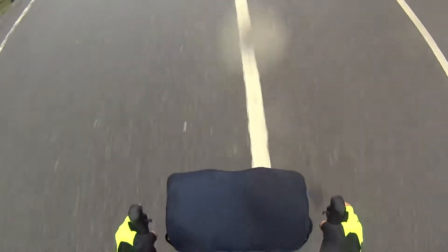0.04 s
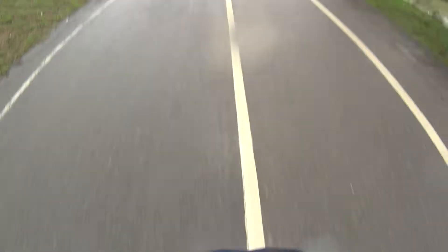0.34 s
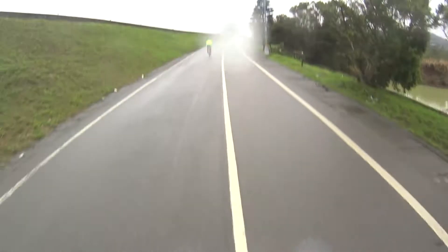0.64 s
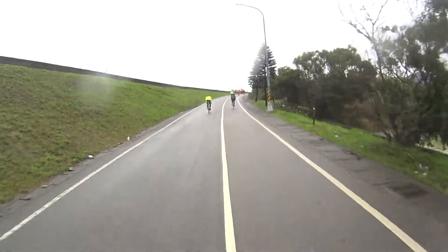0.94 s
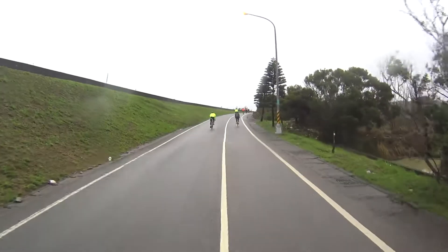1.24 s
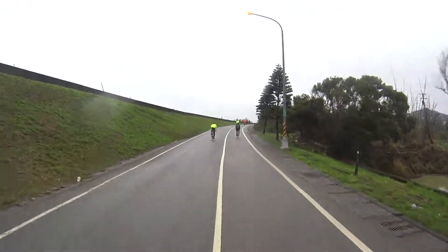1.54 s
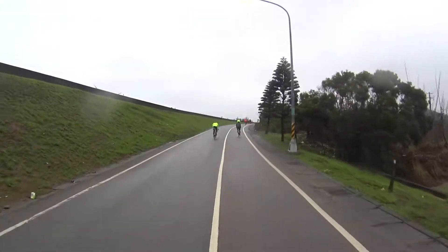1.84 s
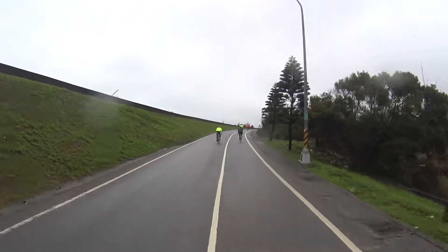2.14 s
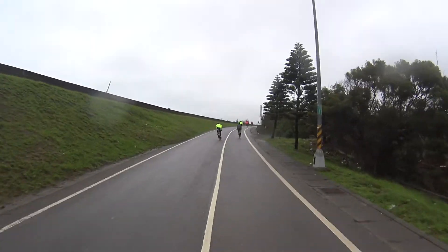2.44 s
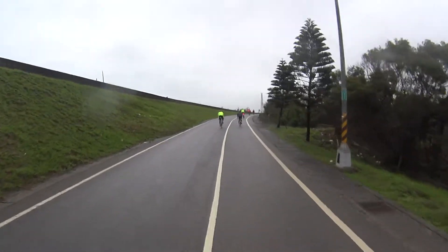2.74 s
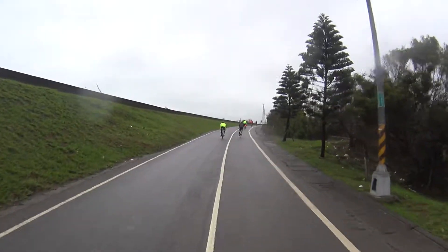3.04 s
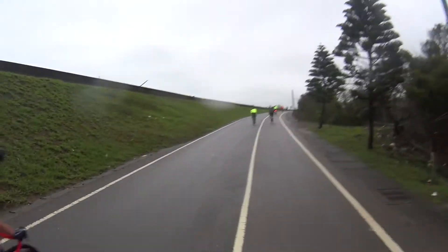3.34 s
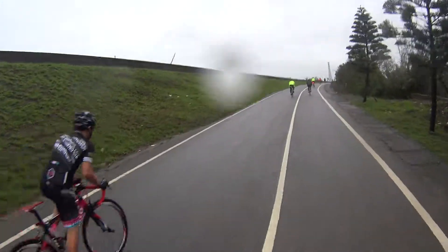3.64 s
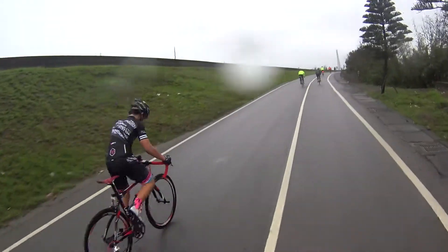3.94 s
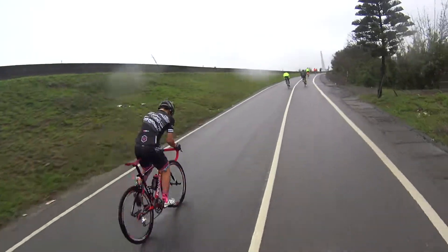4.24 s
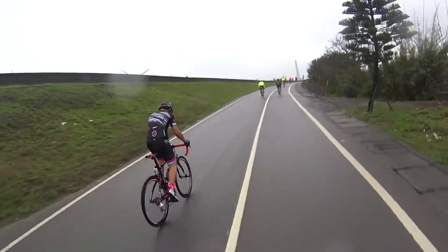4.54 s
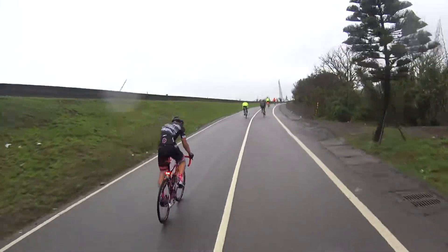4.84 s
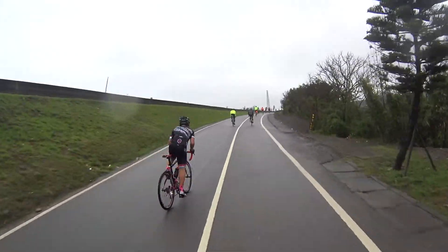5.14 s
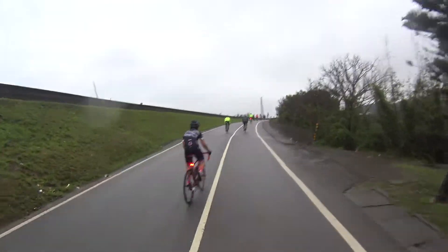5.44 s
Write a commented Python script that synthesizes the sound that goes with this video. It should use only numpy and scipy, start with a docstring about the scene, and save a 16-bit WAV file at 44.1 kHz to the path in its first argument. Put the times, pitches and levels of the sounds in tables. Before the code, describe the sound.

Wind rumbles and rushes over a microphone mounted on a bicycle moving along a wet path, with tyres hissing softly below. At first the air sputters and the mount rattles with quick knocks. The sputter dies, leaving wind and scattered sharp ticks. After a lull, the gusts grow, another bicycle overtakes with a rolling whir and light rattle, and the knocks return.

```python
"""A wet path, heard from the two microphone ports of a camera mounted on a moving bicycle.
At first the camera faces down: air sputters across it and bumps rattle the mount, right at the microphone.
It swings up and the sputter dies. Wind goes on buffeting the case and rushing through its resonances,
while the tyres hiss and throw spray just below; the bike and drops tick, and a few faint scuffs pass.
Near 3.8 s another rider overtakes alongside, and the mount knocks again as the ride goes on."""
import sys
import numpy as np
from scipy.fft import rfft, irfft, next_fast_len
from scipy.io import wavfile
from scipy.ndimage import uniform_filter1d, minimum_filter1d, map_coordinates

SR = 44100
rng = np.random.default_rng(int(sys.argv[2]) if len(sys.argv) > 2 else 0)


def output_pcm(signal):
    """Save a mono or channel-first signal as 16-bit PCM at the path in sys.argv[1].

    Samples are clipped to [-1, 1] before scaling.
    """
    pcm = np.clip(np.atleast_2d(signal).T, -1, 1) * 32767
    wavfile.write(sys.argv[1], SR, np.round(pcm).astype(np.int16))


N = 246078
TIME_S = np.arange(N) / SR


# Spectra of the wind's low buffeting, its rush and its thin edge near 2 kHz: frequency_hz, level_db
BUFFET_SPECTRUM = [(15, -29), (25, -14), (45, -7), (75, 0), (140, 0.5), (210, -3.5), (300, -10),
                   (450, -15.5), (700, -16.5), (1200, -35), (3000, -60), (6000, -100)]
RUSH_SPECTRUM = [(100, -46), (300, -26.5), (600, -17.5), (1000, -14.5), (1200, -4), (1500, -4), (1800, -3),
                 (2100, -8), (2800, -16), (3600, -24), (6000, -36), (11000, -75)]
EDGE_SPECTRUM = [(900, -64), (1700, -46), (2100, -2), (2350, 3), (2800, -4.5), (3400, -10.5), (4500, -18),
                 (8000, -58)]
# Rise and fall of the edge, on top of what the airflow gives it: time_s, gain_db
EDGE_GAIN = [(0.0, 2), (0.3, 4.5), (0.68, -5.9), (1.05, 1.2), (1.6, 1.4), (2.85, 3.5), (3.5, 0), (4.1, -2),
             (4.5, 1.5), (4.8, -12.5), (5.2, 1.5), (5.58, -2.1)]

def wind(buffet_db, rush_db, swing_s, shelter_db=3.5, shelter_end_s=0.316):
    """At the microphone, low eddies press on both ports alike; finer ones and road chatter sound the case."""
    # facing down, the ports are sheltered from the low eddies
    sheltered = np.clip((shelter_end_s - TIME_S) / swing_s, 0, 1)
    buffet_gain = amp(buffet_db - shelter_db * sheltered + 0.73 + 1.4 * wobble(14))
    buffet = buffet_gain * ports(noise(), BUFFET_SPECTRUM)
    eddies = amp(0.65 * wobble(18) + 1.1 * wobble(70))
    chatter = grains(per_s=500, spread_db=7.5)
    rush = amp(rush_db - 1.05) * hollow_case(ports(noise() + 0.35 * chatter, RUSH_SPECTRUM))
    edge_db = rush_db - 7 + over_time(EDGE_GAIN)
    edge = amp(edge_db - 1.5) * ports(noise() + 0.81 * chatter, EDGE_SPECTRUM)
    return buffet + eddies * (rush + edge)


# Spectrum of the air tearing off the case: frequency_hz, level_db
SPUTTER_SPECTRUM = [(200, -34), (600, -29), (1000, -8), (1350, -7.5), (1750, -2), (2200, 4), (2600, -9),
                    (3300, -18), (6000, -41), (11000, -74)]

def sputter(lift_s, swing_s, drop_db=8, fade_db_per_s=31):
    """Air tears off the lowered case in bursts, different at each port; it dies as the camera swings up."""
    since_lift_s = np.maximum(TIME_S - lift_s, 0)
    raised = np.minimum(since_lift_s / swing_s, 1)
    level_db = -22 - drop_db * raised - fade_db_per_s * since_lift_s
    bursts = unit_rms(amp(3.5 * wobble(129.8)))
    correlation = [(400, 0.5), (1000, -0.1), (1400, 0.61), (2100, -0.87), (3000, 0.0024)]
    return amp(level_db) * bursts * ports(noise(), SPUTTER_SPECTRUM, correlation)


# Spectra of the tyres' wet hiss and their roar: frequency_hz, level_db
HISS_SPECTRUM = [(800, -17.5), (2500, -0.5), (3500, -1), (4400, 2), (4750, -1.5), (5050, 2), (5450, -4.5),
                 (5900, -2.5), (6700, -8.5), (7700, -15), (9200, -32), (11000, -38)]
ROAR_SPECTRUM = [(100, -7), (300, -3.5), (600, -8), (1000, -3), (1300, 2), (1600, -8.5), (2200, -16.5),
                 (5000, -66)]

def tyres(hiss_db, rush_db):
    """Just below the camera, wet tread peels off the asphalt with a fine spray; its roar sounds the case."""
    spray = noise() + 0.47 * grains(per_s=900, spread_db=17)
    hiss = amp(hiss_db + 1.5 + 1.17 * wobble(25)) * ports(spray, HISS_SPECTRUM)
    # the finest mist grows faster than the hiss
    mist_spectrum = [(4500, -26), (7000, -2), (8500, 1), (11000, -5)]
    mist = amp(1.446 * hiss_db + 3.5 + 1.3 * wobble(21)) * ports(noise(), mist_spectrum)
    roar = amp(-27.5 + 0.26 * rush_db) * hollow_case(ports(noise(), ROAR_SPECTRUM))
    return hiss + mist + roar


# Knocks of the camera mount: start_s, level_db, pitch_hz
MOUNT_KNOCKS = [(0.0449, -12, 1900), (.0706, -10, 2220), (0.1055, -10.5, 2280), (.1166, -11, 1830),
                (.1391, -8, 1640), (0.1494, -7.5, 1570), (0.179, -10.5, 1430), (0.2117, -7, 1990),
                (0.2431, -13.5, 2460), (0.309, -11, 1640), (0.355, -8.5, 1420), (.449, -14.5, 1450),
                (0.5388, -11, 1600), (3.2913, -10.5, 1370), (3.4241, -10.5, 1370), (3.916, -7, 1440),
                (3.9486, -11.5, 1490), (4.2886, -7.5, 1340), (4.6218, -9.5, 1590), (5.406, -10.5, 1470)]
# Dull bumps coming up through the frame: start_s, level_db, pitch_hz
FRAME_BUMPS = [(0.1745, -12.5, 580), (.353, -19, 830), (4.401, -18, 820)]

def mount():
    """Right at the camera, knocks ring the mount and rattle the case; bumps thump through the frame."""
    out, t = np.zeros((2, N)), np.arange(SR // 10) / SR
    onset = (1 - np.exp(-t / 0.00025)) ** 2
    for start_s, level_db, pitch_hz in MOUNT_KNOCKS:
        ring = np.sin(2 * np.pi * pitch_hz * t) * decay(t, t60_s=0.014) * onset
        case_noise = hollow_case(ports(noise(len(t)), RUSH_SPECTRUM, SIDE_CORRELATION))
        rattle = case_noise * t * decay(t, t60_s=0.044)
        add(out, start_s, amp(level_db - 1.5) * unit_peak(ring))
        add(out, start_s - 0.004, amp(level_db - 3.5) * unit_peak(rattle))
    for start_s, level_db, pitch_hz in FRAME_BUMPS:
        # a heavily damped push of barely two cycles, with a short dull shudder
        thump = np.sin(2 * np.pi * pitch_hz * t) * np.exp(-pitch_hz * t) * onset
        dull_noise = lowpass(rng.standard_normal(len(t)), 2.3 * pitch_hz, steepness=8)
        shudder = dull_noise * decay(t, t60_s=0.05) * onset
        add(out, start_s, amp(level_db) * (unit_peak(thump) + unit_peak(shudder)))
    return out


# Sharp ticks from the bike and from drops: start_s, level_db, pitch_hz, nominal_length_s
CONTACT_TICKS = [(0.2408, -14, 3670, 0.0015), (.28, -31.5, 4600, 0.03), (.3661, -26, 4750, 0.007),
                 (0.4454, -14.5, 4130, 0.00076), (0.5672, -15, 3800, 0.0017), (0.9674, -11, 4380, 0.0036),
                 (1.0304, -21.5, 5440, .003), (1.2954, -12, 4400, 0.0038), (1.5017, -16.5, 2680, 0.0076),
                 (2.4135, -19.5, 4740, 0.0014), (3.4875, -8.5, 2850, 0.0057), (3.7538, -12, 3600, 0.0023),
                 (3.843, -17, 3670, .0023), (3.8837, -11.5, 2920, 0.0044), (3.998, -20, 3250, 0.0022),
                 (4.321, -9, 4130, 0.00077), (4.7309, -11.5, 5060, 0.0015), (4.9598, -11.5, 4280, 0.0036),
                 (5.4042, -11.5, 4600, 0.0011)]

def ticks():
    """Hard little contacts close to the microphone: each is a ping, a snap and a shiver of hiss."""
    out, t = np.zeros((2, N)), np.arange(SR // 30) / SR
    blow = np.sin(2 * np.pi * 2600 * t) * decay(t, t60_s=0.0032) * (1 - np.exp(-t / 0.0001))
    for start_s, level_db, pitch_hz, length_s in CONTACT_TICKS:
        ping = unit_peak(np.sin(2 * np.pi * pitch_hz * t) * t * decay(t, t60_s=0.64 * length_s))
        # the shorter the ping, the more of the blow goes into the snap
        snap = unit_peak(blow) / (1 + (length_s / 0.002) ** 2)
        shiver = unit_peak(ports(noise(len(t)), HISS_SPECTRUM) * decay(t, t60_s=0.025))
        add(out, start_s, amp(level_db) * (ping + amp(-1) * snap + amp(-11) * shiver))
    return out


# Spectra of the other bicycle's tyres and its loose rattle: frequency_hz, level_db
ROLLING_SPECTRUM = [(700, -42), (1300, -16), (1550, 3.5), (1800, 5), (2200, 2.5), (3000, -4.5), (6000, -37),
                    (11000, -55)]
RATTLE_SPECTRUM = [(1200, -22), (2000, -6), (3000, 2), (4300, -6), (6000, -20), (11000, -45)]
# Sound from the side drives the ports in opposition near 2.2 kHz: frequency_hz, correlation
SIDE_CORRELATION = [(1200, 0.36), (1650, 0.98), (1950, 0.49), (2200, -0.92), (2600, 0.4), (3400, 0.81)]

def overtaker(nearest_s, fade_s):
    """Another bicycle draws alongside and pulls ahead: its tyres and rattle swell and fade with distance."""
    distance = np.hypot(1, (TIME_S - nearest_s) / fade_s)  # 1 when level with the camera
    rolling = amp(-28 + 0.77 * wobble(60)) * ports(noise(), ROLLING_SPECTRUM, SIDE_CORRELATION)
    rattle = amp(-39) * ports(grains(per_s=29, spread_db=7), RATTLE_SPECTRUM)
    return rolling / distance ** 2 + rattle / distance ** 4


# Brief scuffs and hums: centre_s, level_db, pitch_hz
FAINT_SCUFFS = [(1.398, -26.5, 1400), (1.658, -30.5, 1390), (2.489, -37, 2580), (2.927, -33, 2360)]

def scuffs(swell_s=0.024, half_width_hz=160):
    """Behind the wind, narrow bands of noise swell and fade within a few hundredths of a second."""
    out = np.zeros(N)
    for centre_s, level_db, pitch_hz in FAINT_SCUFFS:
        band = filtered(rng.standard_normal(N), lambda hz: 1 / (1 + ((hz - pitch_hz) / half_width_hz) ** 2))
        swell = np.exp(-0.5 * ((TIME_S - centre_s) / swell_s) ** 2)
        out += amp(level_db) * unit_rms(band) * swell
    return out


# Air resonances of the camera case: centre_hz, width_hz, strength_db
CASE_RESONANCES = [(814, 82, 2), (1304, 84, -2), (1670, 620, -15.5)]

def hollow_case(x):
    """The case around the microphone lifts whatever passes near its resonances; overall level is kept."""
    def response(hz):
        return 1 + sum(amp(db) * 1j * hz * width / (centre ** 2 - hz ** 2 + 1j * hz * width)
                       for centre, width, db in CASE_RESONANCES)
    coloured = filtered(x, response)
    return coloured * x.std() / coloured.std()


# How alike the two microphone ports hear: frequency_hz, correlation
PORT_CORRELATION = [(100, .997), (300, .965), (600, .83), (780, .76), (920, .5), (1150, .97), (1600, .95),
                    (1900, .84), (2300, .4), (2750, .55), (3400, .74), (4500, .91), (7000, .72),
                    (10000, .9)]

def ports(pair, spectrum, correlation=PORT_CORRELATION):
    """Two unrelated signals, coloured and partly shared between the ports; their mid signal has rms 1."""
    def response(hz):
        angle = np.arccos(np.clip(over_frequency(correlation, hz), -1, 1)) / 2
        return amp(over_frequency(spectrum, hz)) * np.array([np.cos(angle), np.sin(angle)])
    mid, side = filtered(pair, response)
    return np.array([mid + side, mid - side]) / mid.std()


# Level between the ports: frequency_hz, left_minus_right_db
PORT_BALANCE = [(40, 1), (100, -1.2), (200, -3), (330, -5.5), (700, -6), (1000, -3.5), (1300, -3.5),
                (1550, -0.8), (1900, -1), (2400, 2.5), (3500, 1), (4600, 1.5), (6500, -1), (10000, 0)]
# Phase between the ports: frequency_hz, left_lead_rad
PORT_PHASE = [(25, -.22), (60, -0.23), (150, -0.41), (550, -0.17), (780, 0.19), (1100, -0.14), (1800, 0.21),
              (2150, 0.68), (2600, 0.47), (3300, -0.061), (7000, -0.37)]

def stereo_image(x):
    """The right port hears the lower middle louder and sooner; the left hears more of the wind's edge."""
    halves = np.array([[0.5], [-0.5]])
    def response(hz):
        gain = amp(halves * over_frequency(PORT_BALANCE, hz))
        return gain * np.exp(1j * halves * over_frequency(PORT_PHASE, hz))
    return filtered(x, response)


def limiter(x, ceiling_db, recovery_db_per_s):
    """Peaks above the ceiling push the camera's gain down; it recovers at a steady rate."""
    over_db = np.maximum(20 * np.log10(np.abs(x).max(axis=0) + 1e-9) - ceiling_db, 0)
    recovery_db = recovery_db_per_s * TIME_S
    gain = amp(recovery_db - np.maximum.accumulate(over_db + recovery_db))
    return x * uniform_filter1d(minimum_filter1d(gain, size=31), size=31)


def amp(db):
    return 10 ** (np.asarray(db) / 20)


def decay(t, t60_s):
    return amp(-60 * t / t60_s)


def unit_rms(x):
    return x / np.sqrt(np.mean(x ** 2) + 1e-20)


def unit_peak(x):
    return x / np.abs(x).max()


def over_frequency(points, hz):
    """Join (frequency_hz, value) points on a log axis."""
    knots_hz, values = np.transpose(points)
    return np.interp(np.log(hz + 1), np.log(knots_hz + 1), values)


def over_time(points):
    """Join (time_s, value) points, one value a sample."""
    return np.interp(TIME_S, *np.transpose(points))


def noise(samples=N):
    return rng.standard_normal((2, samples))


def wobble(knots_per_s):
    """A smooth random curve."""
    knots = rng.standard_normal(int(N * knots_per_s / SR) + 4)
    return map_coordinates(knots, [TIME_S * knots_per_s])


def grains(per_s, spread_db):
    """Random tiny impacts of unequal size."""
    hits = rng.random(N) < per_s / SR
    sizes = amp(spread_db * rng.uniform(-1, 1, N))
    return unit_rms(hits * sizes * np.sign(noise()))


def filtered(x, response):
    """Multiply the spectrum of x by response(hz)."""
    n = x.shape[-1]
    padded = next_fast_len(n + 4096)
    return irfft(rfft(x, padded) * response(np.fft.rfftfreq(padded, 1 / SR)), padded)[..., :n]


def lowpass(x, cutoff_hz, steepness):
    return filtered(x, lambda hz: 1 / np.sqrt(1 + (hz / cutoff_hz) ** steepness))


def add(track, start_s, sound):
    """Mix a sound into a track."""
    part = track[..., max(round(start_s * SR), 0):][..., :sound.shape[-1]]
    part += sound[..., :part.shape[-1]]


# Strength of the passing air, which drives the wind and the tyre noise: time_s, level_db
PASSING_AIR = [(0.0, -1.8), (0.24, -2), (0.66, 3), (0.98, -0.8), (1.44, -0.4), (1.6, -2), (2.02, -5.5),
               (2.22, -3), (2.35, -7), (2.58, -1.5), (2.72, -4), (3.08, -1.0), (3.35, 4.5), (3.52, 0.9),
               (3.6, 4.5), (3.76, 0.6), (3.97, 6.5), (4.31, 0.7), (4.42, 4.5), (4.57, 2), (4.7, 4.5),
               (4.8, 0.9), (5.12, 2.1), (5.24, 0.3), (5.58, 1.2)]

def scene():
    """The ride from the camera's place: air on the case, its own bicycle below, another alongside."""
    airflow_db = over_time(PASSING_AIR)
    buffet_db = -32.5 + 1.02 * airflow_db
    rush_db = -29.5 + 1.09 * airflow_db
    hiss_db = -41.5 + 0.96 * airflow_db
    swing_s = 0.039  # the camera swings up this quickly
    air = wind(buffet_db, rush_db, swing_s) + sputter(lift_s=0.12, swing_s=swing_s)
    other_bike = overtaker(nearest_s=3.84, fade_s=0.47)
    return stereo_image(air + other_bike + tyres(hiss_db, rush_db) + scuffs() + mount() + ticks())


def record(dry):
    """The camera limits peaks and cuts off steeply above 11 kHz."""
    limited = limiter(dry, ceiling_db=-2.5, recovery_db_per_s=250)
    return lowpass(limited, cutoff_hz=11080, steepness=260)


dry = scene()
out = record(dry)
output_pcm(out)
```